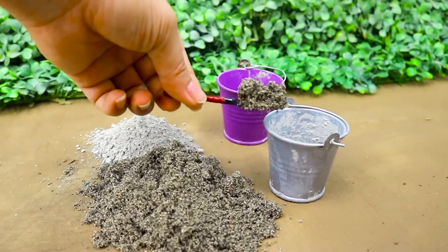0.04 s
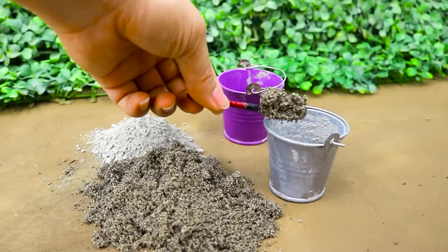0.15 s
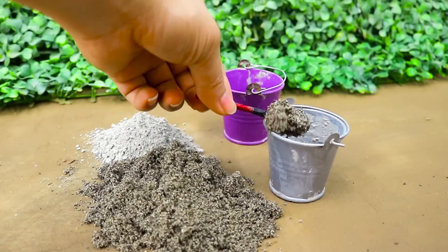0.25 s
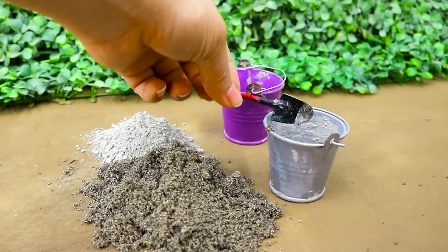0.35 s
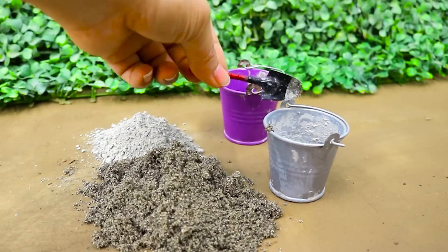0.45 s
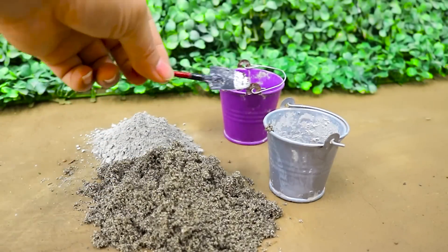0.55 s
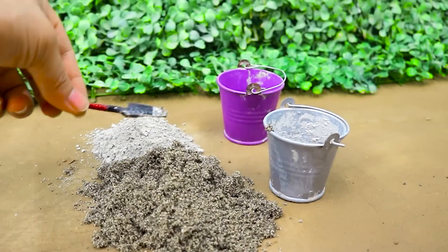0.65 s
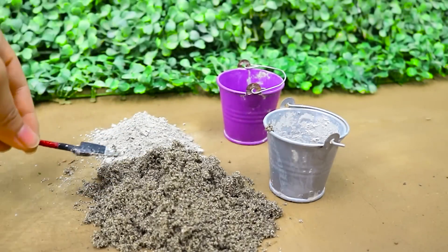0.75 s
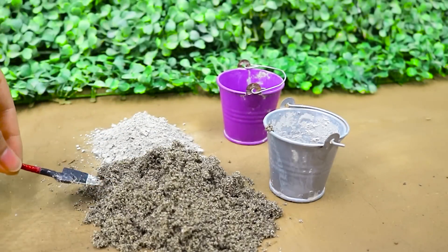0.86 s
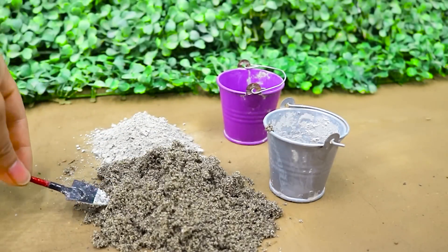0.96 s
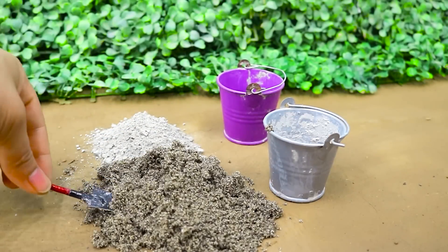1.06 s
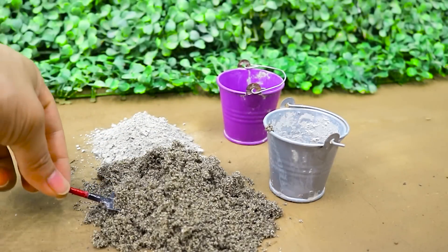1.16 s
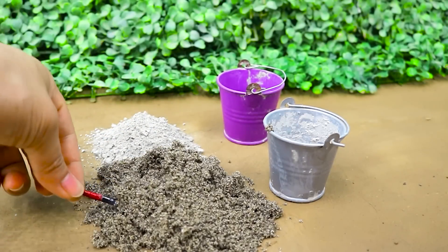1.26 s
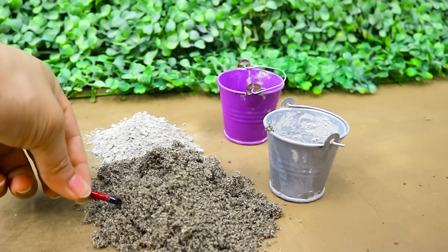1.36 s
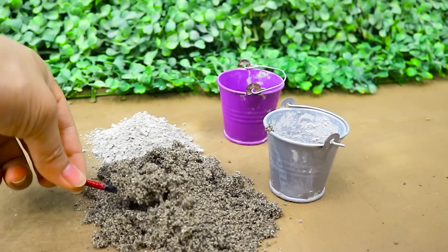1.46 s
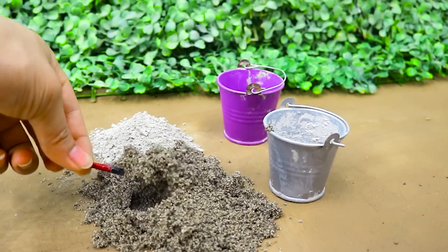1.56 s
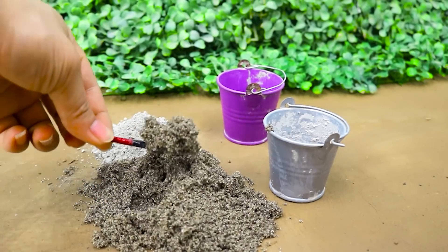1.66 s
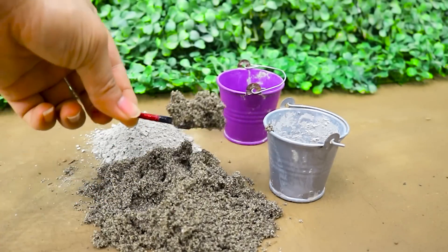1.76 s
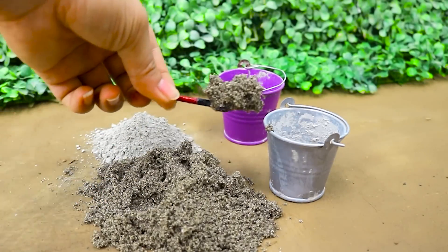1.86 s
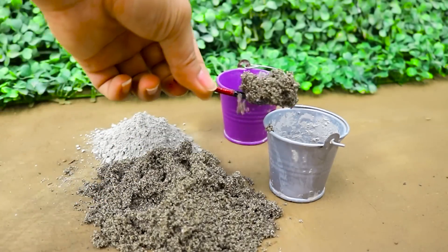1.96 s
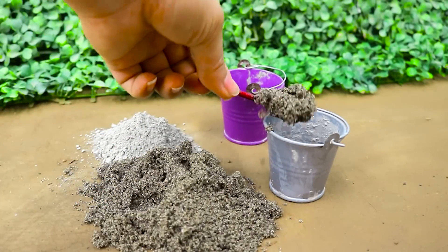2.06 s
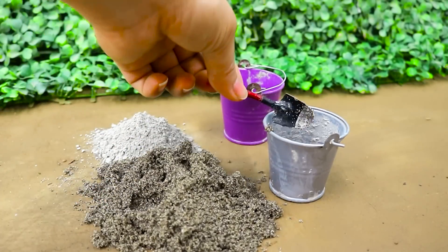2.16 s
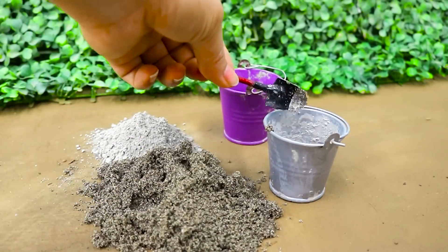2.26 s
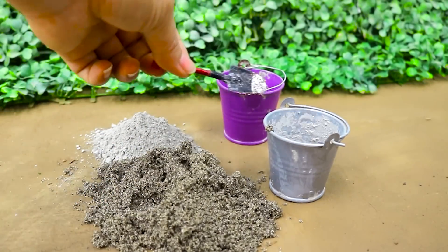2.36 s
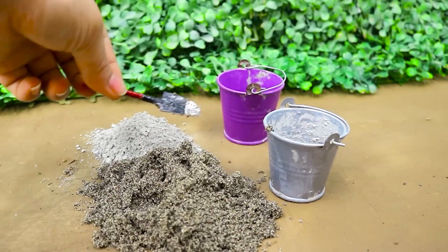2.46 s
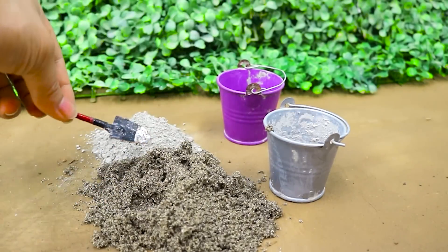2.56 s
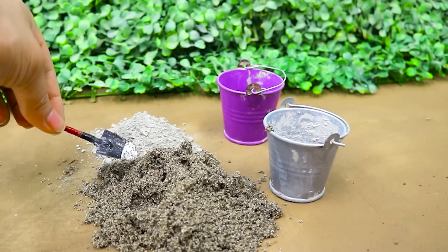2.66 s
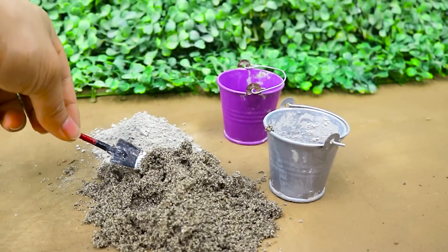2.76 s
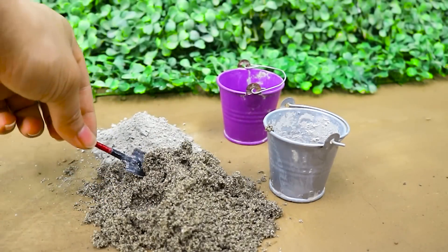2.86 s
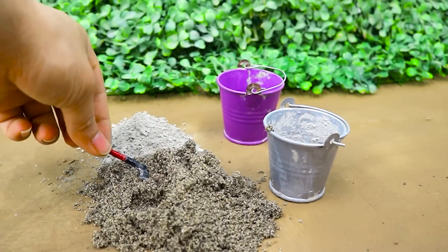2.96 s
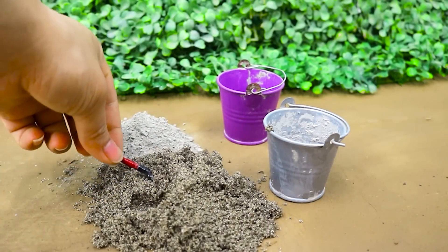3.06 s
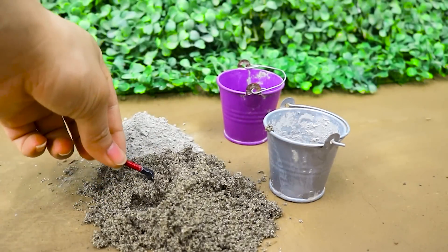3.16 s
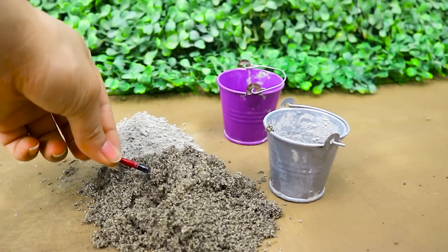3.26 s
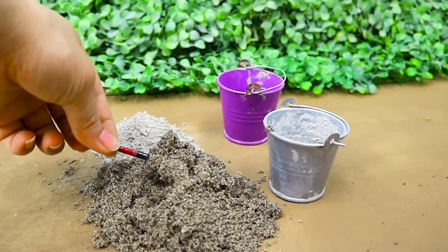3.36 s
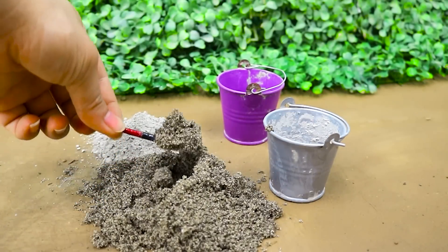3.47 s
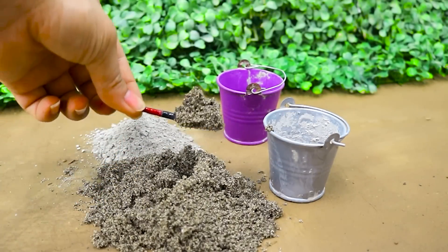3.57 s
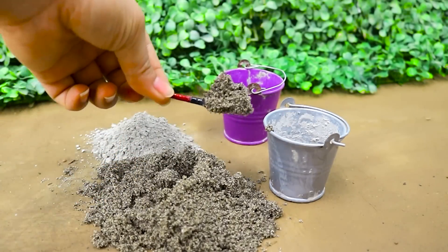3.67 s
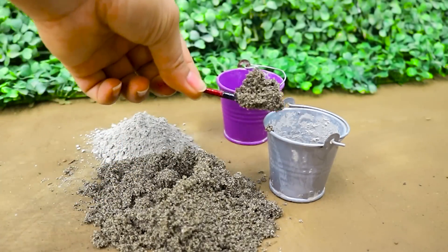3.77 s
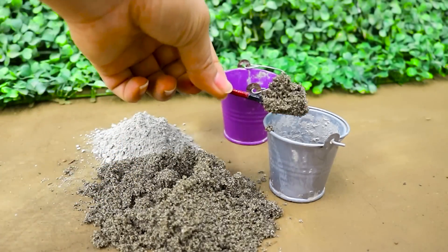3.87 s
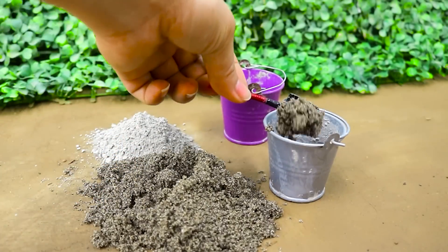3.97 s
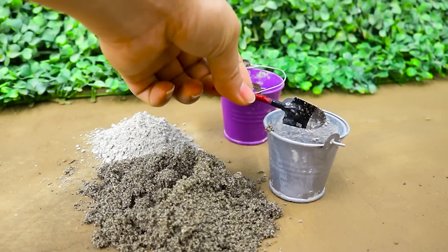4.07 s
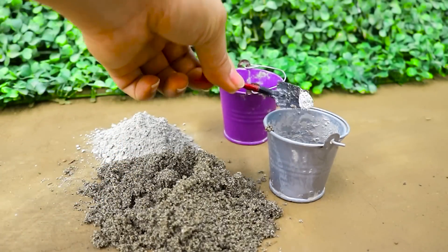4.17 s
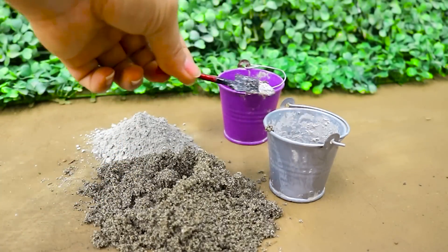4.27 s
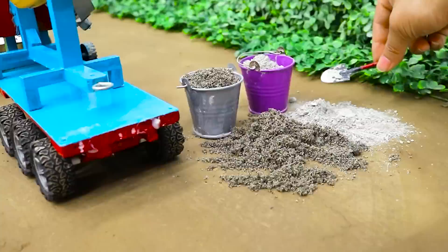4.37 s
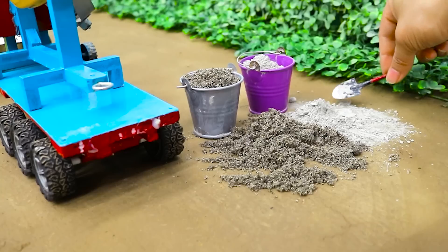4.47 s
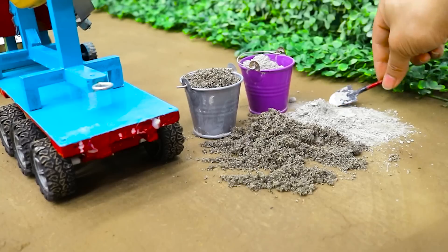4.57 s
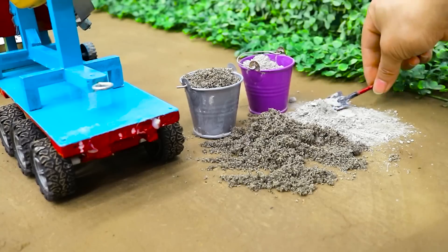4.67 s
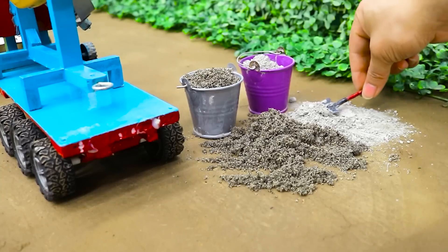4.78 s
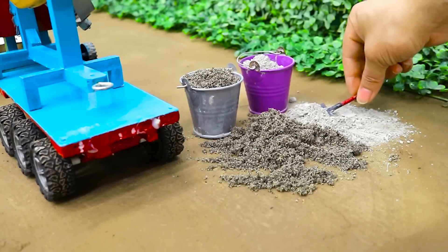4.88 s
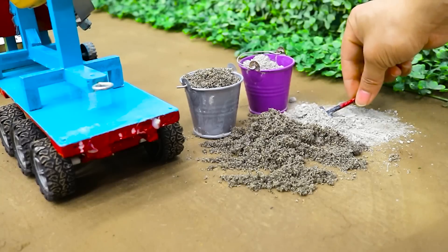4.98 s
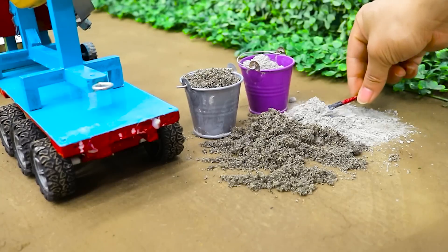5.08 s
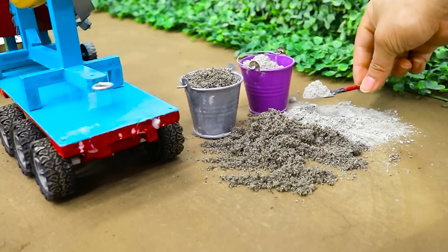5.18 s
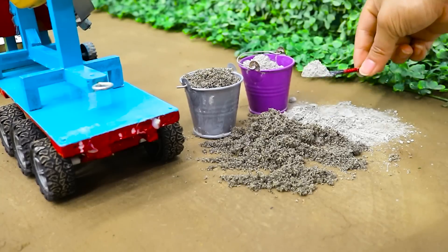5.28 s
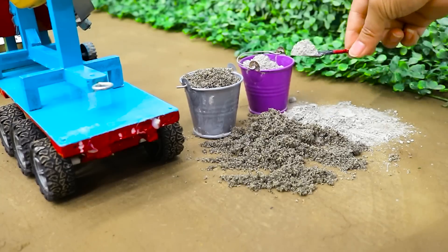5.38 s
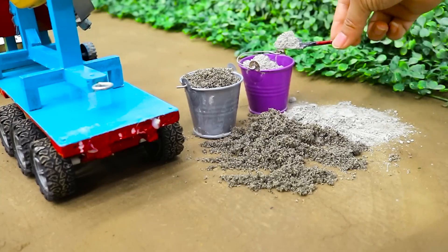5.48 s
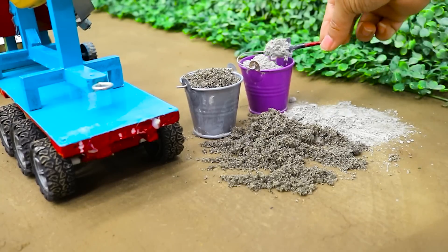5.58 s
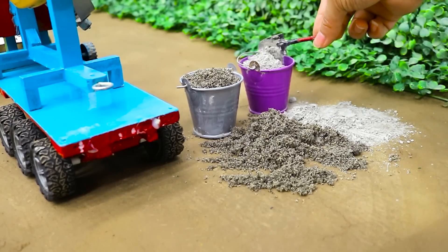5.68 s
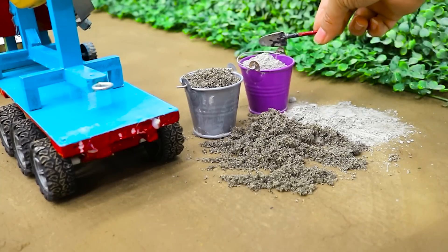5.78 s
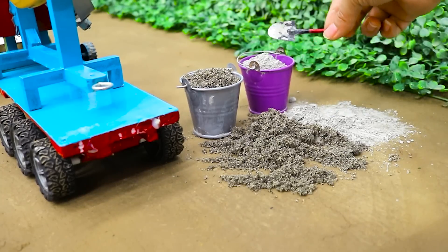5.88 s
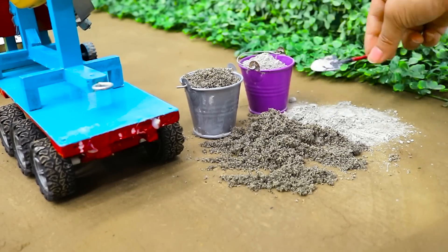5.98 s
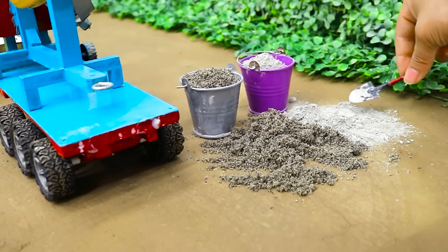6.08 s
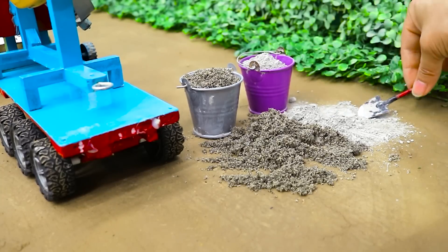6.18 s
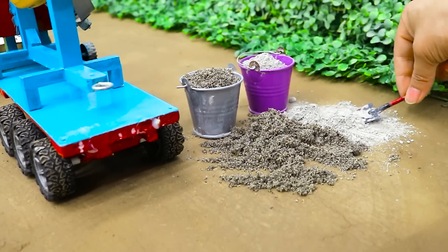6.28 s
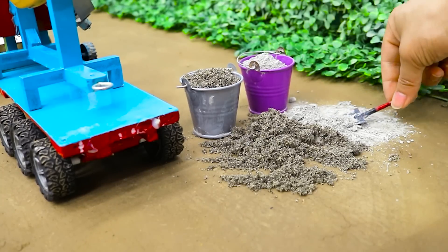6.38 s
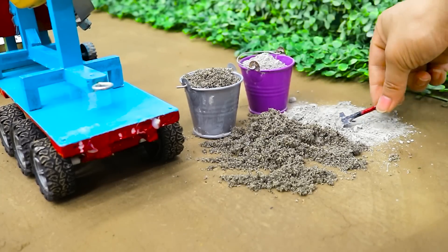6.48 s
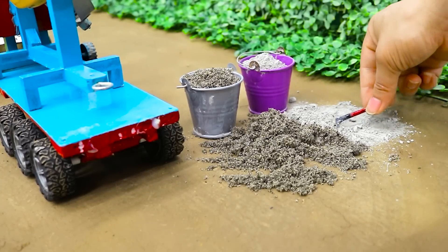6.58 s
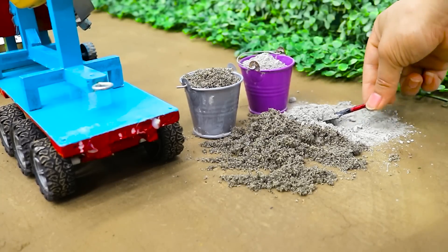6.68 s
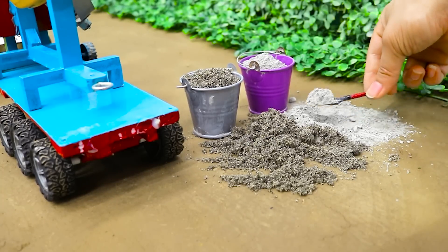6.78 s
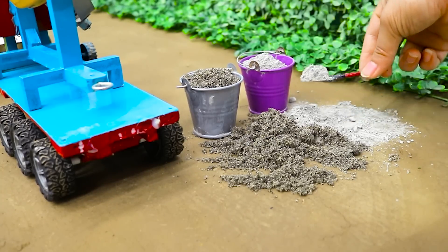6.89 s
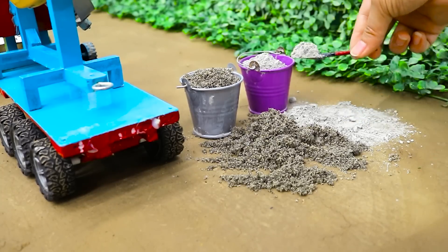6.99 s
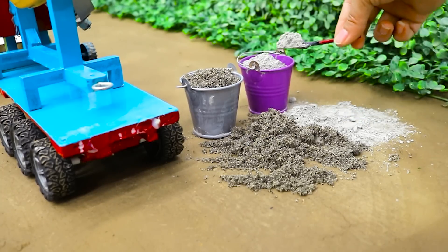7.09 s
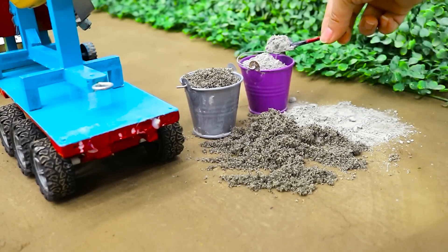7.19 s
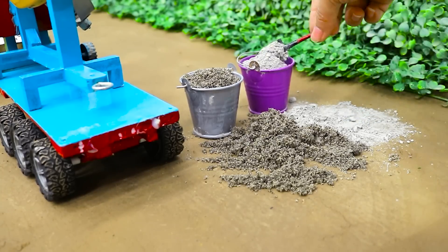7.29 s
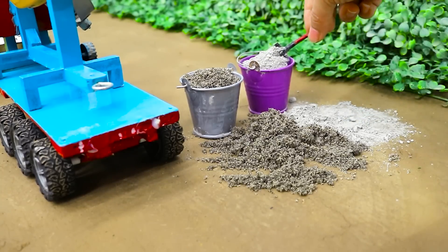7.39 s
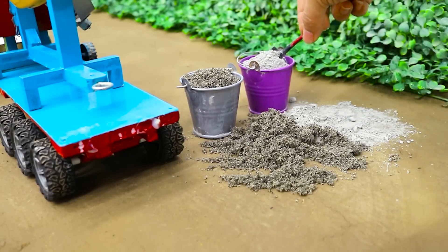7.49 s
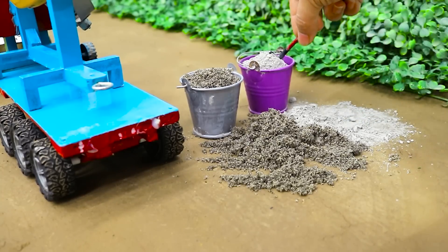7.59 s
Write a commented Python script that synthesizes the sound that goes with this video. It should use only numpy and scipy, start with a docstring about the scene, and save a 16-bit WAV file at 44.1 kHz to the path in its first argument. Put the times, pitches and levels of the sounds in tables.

```python
"""Toy shovel, sand and tin bucket

A toy shovel digs into a heap of dry sand and tips it into a little tin bucket, heard from close by.
One scoop and one pour recur: coloured streams of random grain impacts crunch along the blade and patter
on the tin, while sums of decaying sines ring blade and bucket. Stray grit ticks and the blade clinks.
Coloured noise makes a low rumble around each pour and a steady hush; a last scrape ends the scene."""
import sys
import numpy as np
from scipy import signal
from scipy.fft import rfft, irfft
from scipy.io import wavfile
from scipy.ndimage import uniform_filter1d

SR = 44100
rng = np.random.default_rng(int(sys.argv[2]) if len(sys.argv) > 2 else 0)


def generate_wav(signal):
    """Clip the signal to [-1, 1] and save it as 16-bit WAV at the path in sys.argv[1]."""
    frames = np.transpose(np.atleast_2d(signal))
    scaled = np.clip(frames, -1, 1) * 32767
    pcm = np.round(scaled).astype(np.int16)
    wavfile.write(sys.argv[1], SR, pcm)


N = 336924
TIME = np.arange(N) / SR
# Spectrum of grains falling on sand and tin.
# Each row: frequency in Hz, relative spectrum level in dB.
POUR_COLOUR = [(150, -46), (250, -14.5), (533, -7.5), (1060, -16), (1320, -6), (1890, -11), (2090, -1.5),
               (2600, -5.5), (3180, -6.5), (3640, -7), (4160, -3), (9190, -2.5), (12700, -15.5),
               (14000, -62.5)]
POUR_WINDOW_S = (1.446, 2.799)  # the pour and its rumble sound only between these times
SWITCH_DB_PER_S = 5000  # slope at both edges of that window


def undb(db):
    """Level and amplitude: 20 dB is a factor of ten in gain."""
    return 10 ** (np.asarray(db) / 20)


def through(x, response):
    """Linear system: the output is the input convolved with the impulse response."""
    return signal.oaconvolve(x, response)[:N]


def unit(response):
    """Normalisation: scale a response to unit energy."""
    return response / np.sqrt(np.sum(response ** 2))


def colour(points, band=None, size=4096):
    """Minimum-phase response by folding the cepstrum; white noise of rms 1 leaves with rms 1 in the band."""
    f = np.arange(size // 2 + 1) * SR / size
    hz, db = np.transpose(points)
    gain = undb(np.interp(np.log(f + 1), np.log(hz), db))
    lo, hi = band or (0, SR)
    gain = gain / np.sqrt(np.mean(gain ** 2 * (f >= lo) * (f <= hi)))
    cepstrum = irfft(np.log(gain))
    cepstrum[1:size // 2] *= 2
    cepstrum[size // 2 + 1:] = 0
    return irfft(np.exp(rfft(cepstrum)))


def split(x, hz, kind, order=2):
    """Band separation: a gentle Butterworth low-pass, high-pass or band-pass."""
    return signal.sosfilt(signal.butter(order, hz, kind, fs=SR, output="sos"), x)


def cut(x, hz):
    """Band limiting: a steep elliptic low-pass."""
    lowpass = signal.ellip(8, .2, 70, hz, fs=SR, output="sos")
    return signal.sosfilt(lowpass, x + 1e-18)  # the tiny offset avoids denormal numbers


def ring(modes):
    """Modal superposition: a struck body is a sum of decaying sines, each with the energy its dB gives."""
    t = TIME[:SR // 2]
    total = 0
    for k, (hz, db, t60) in enumerate(modes):
        envelope = undb(db - 60 * t / t60) / np.sqrt(t60)
        total = total + envelope * np.sin(2 * np.pi * hz * t) * (-1) ** k
    return unit(total)


def burst(t60):
    """Diffuse decay: exponentially dying noise, the sound of a dense cluster of tiny events."""
    t = TIME[:SR // 4]
    return unit(rng.standard_normal(len(t)) * np.exp(-np.log(1000) * t / t60))


def grains(rate, spread_db):
    """Shot noise: random collisions (rate a second) of uneven size, scaled to rms 1."""
    chance = np.clip(rate / SR, 1e-4, 1)
    hits = (rng.random(N) < chance) * rng.choice([-1, 1], N) / np.sqrt(chance)
    size = undb(spread_db * np.clip(rng.standard_normal(N), -2, 2))
    return hits * size / np.sqrt(np.mean(size ** 2))


def slips(rate, depth_db):
    """Stick-slip: sand holds and gives way in small jerks, an uneven gain of rms 1."""
    gain = undb(depth_db * np.interp(TIME * rate, np.arange(N), rng.standard_normal(N)))
    return gain / np.sqrt(np.mean(gain ** 2))


def blows(times, db):
    """Impulsive excitation: one single-sample impact for each event."""
    out = np.zeros(N)
    out[(np.asarray(times) * SR).astype(int)] = undb(db)
    return out


def swell(start, end, rise, fall):
    """Exponential envelope: rises (dB per s) to 1 at start, holds until end, then falls (dB per s)."""
    drop_db = rise * np.maximum(start - TIME, 0) + fall * np.maximum(TIME - end, 0)
    return undb(-np.minimum(drop_db, 160))


def together(gains):
    """Incoherent addition: unrelated sounds add in power."""
    return np.sqrt(sum(g ** 2 for g in gains))


def repeat(x, shifts):
    """Time translation: the same gesture shifted to each of its moments (s)."""
    padded = np.pad(x, ((0, 0), (N, N)))
    return sum(padded[:, N - round(s * SR):2 * N - round(s * SR)] for s in shifts)


def place(x, low_db, bright_db, t60):
    """Mid-side stereo: a central sound; antiphase decaying noise widens the lows and, faintly, the very top."""
    tail = through(x, burst(t60))
    side = undb(low_db) * split(tail, 770, "low") + undb(bright_db) * split(tail, 9600, "high")
    return np.array([x + side, x - side])


def cracks(rows, points, snap_db, crumble_db, t60):
    """Brittle fracture: a coarse grain snaps, then crumbles for a few milliseconds."""
    hits = blows(*np.transpose(rows))
    crumble = through(hits, burst(t60))
    return through(undb(snap_db) * hits + undb(crumble_db) * crumble, colour(points))


def shimmer(x, share_db, t60):
    """High-passed noise tail: each contact gets a brief, dense, bright shimmer."""
    bright_tail = split(through(x, burst(t60)), 2900, "high")
    return (x + undb(share_db) * bright_tail) / np.sqrt(1 + undb(2 * share_db))


def air(points, side_db, side_hz):
    """Mid-side noise field: coloured noise, wide in the bass and central above."""
    mid, side = (through(rng.standard_normal(N), colour(points)) for _ in range(2))
    side = undb(side_db) * split(side, side_hz, "low", order=1)
    return np.array([mid + side, mid - side])


def hush():
    """Stationary coloured noise: a faint hush whose level dips briefly at two moments."""
    # Spectrum of the hush. Each row: frequency in Hz, relative spectrum level in dB.
    hush_colour = [(12, -43), (30, -21), (65, -10), (110, -14.5), (170, -17), (270, -22.5), (420, -31),
                   (800, -36), (1600, -50), (12000, -63.5), (16000, -75.5)]
    level_db, dip_db = -57, -50
    dip_times_s, dip_length_s = [.928, 4.628], .076  # middles and length of the dips
    dipped = sum(np.abs(TIME - s) < dip_length_s / 2 for s in dip_times_s)
    gain = undb(level_db + dip_db * uniform_filter1d(1. * dipped, size=256))
    return gain * air(hush_colour, side_db=-1.5, side_hz=1200)


def rumble():
    """Low-weighted noise: a rumble whose level sags slowly in time."""
    # Spectrum of the rumble. Each row: frequency in Hz, relative spectrum level in dB.
    rumble_colour = [(12, -23), (28, 7), (48, -2), (75, -6), (110, -5), (165, -9), (240, -16.5),
                     (420, -22.5), (780, -28), (1300, -34.5), (2200, -34.5), (4400, -41), (9000, -34.5),
                     (13000, -42.5), (15000, -73.5)]
    level_db, sag_db_per_s = -40, 1.5  # level at the start of the pour window
    gain = undb(level_db - sag_db_per_s * (TIME - POUR_WINDOW_S[0]))
    return gain * air(rumble_colour, side_db=-5.0, side_hz=1200)


def dragging():
    """Friction envelope: the hiss and crunch gains of the last drags."""
    # Last drags of the blade.
    # Each row: start in seconds, end in seconds, hiss gain in dB, crunch gain in dB.
    drags = [(7.442, 7.504, -31.5, -43), (7.576, 7.64, -32.5, -38)]
    pulls = [(swell(start, end, 498, 400), hiss_db, crunch_db) for start, end, hiss_db, crunch_db in drags]
    hiss = together(pull * undb(db) for pull, db, _ in pulls)
    crunch = together(pull * undb(db) for pull, _, db in pulls)
    return hiss, crunch


def scrape():
    """Granular friction: dragging the blade through sand makes fine hiss, deep crunch and a crack."""
    # Spectrum of the dragged sand. Each row: frequency in Hz, relative spectrum level in dB.
    scrape_colour = [(180, -45), (300, -10), (915, -4), (994, -2.5), (1870, -5), (2480, -5), (6100, -6),
                     (10900, -2.5), (14500, -3.5), (16000, -24)]
    # Coarse grain cracking under the blade. Each row: time in seconds, relative level in dB.
    scrape_cracks = [(7.5441, -12.5)]
    hiss, crunch = dragging()
    high, low = colour(scrape_colour, (11000, 15000)), colour(scrape_colour, (400, 1200))
    fine = split(through(grains(rate=4600, spread_db=0) * hiss, high), 3000, "high")
    deep = split(through(grains(rate=3600, spread_db=1.5) * crunch, low), 4300, "low")
    crack = cracks(scrape_cracks, scrape_colour, snap_db=-6, crumble_db=7, t60=0.011)
    out = undb(-1.5) * fine + undb(-.3) * deep + crack
    return place(out, low_db=-10.5, bright_db=-13.0, t60=.08)


def digging():
    """Granular shear: hiss and crunch gains of thrusts as the blade bites, then surges as it lifts."""
    # Thrusts of the blade into the heap.
    # Each row: time of the hardest push in seconds, hiss gain in dB, crunch gain in dB.
    thrusts = [(2.938, -21, -41), (3.059, -21.5, -36)]
    # Surges of sand as the blade levers it up.
    # Each row: time of the peak in seconds, hiss gain in dB, rise and fall in dB per second.
    surges = [(3.149, -36, 194.5), (3.327, -28.5, 104), (3.412, -30.5, 192), (3.525, -36.5, 195)]
    bite_start, bite_end = 2.888, 3.091  # s: the blade meets the sand and comes to rest
    contact = swell(bite_start, bite_end, rise=2202, fall=2202)
    pushes = [(contact * swell(s, s, 237.5, 237.5), hiss_db, crunch_db) for s, hiss_db, crunch_db in thrusts]
    lift = (TIME > bite_end) * together(undb(db) * swell(s, s, rate, rate) for s, db, rate in surges)
    hiss = together([lift] + [push * undb(db) for push, db, _ in pushes])
    lift_crunch = undb(-22) * lift ** .7  # the crunch grows more slowly than the hiss
    crunch = together([lift_crunch] + [push * undb(db) for push, _, db in pushes])
    sunk = swell(2.915, 2.915, rise=350, fall=0)  # the heap crunches fully once the blade has sunk in
    return hiss, crunch * sunk


def scoop():
    """Friction-driven resonance: grains grind on the buried blade and ring it; the deeper heap crunches."""
    # Spectra of the bite and of the softer lift.
    # Each row: frequency in Hz, relative spectrum level in dB.
    bite_colour = [(120, -67), (200, -14), (240, -29), (273, -16), (647, -14.5), (899, -9.5), (1250, -15.5),
                   (2330, -11.5), (2610, -8.5), (3970, -7), (4350, -13), (5230, -5.5), (11700, 1),
                   (14900, -8), (16000, -32)]
    lift_colour = [(180, -24.5), (300, -28), (379, -10.5), (528, -1.5), (667, -6.5), (787, -3.5),
                   (2520, -3), (2740, 1), (3700, -6.5), (8640, 2.5), (12300, 1.5), (15200, -6),
                   (16000, -22.5)]
    # Modes of the blade in the sand.
    # Each row: frequency in Hz, relative energy in dB, 60 dB decay time in seconds.
    buried_blade = [(900, -14.5, 0.033), (1654, -1, 0.049), (2637, 14, 0.031), (3960, 6.5, 0.021),
                    (7400, -11.5, 0.034), (7290, -28.5, .03), (7636, 19, 0.018), (9120, -16, 0.052),
                    (9030, 14, 0.019), (10500, -3, .03), (11700, -3.5, 0.035), (13000, 1, 0.045)]
    # Coarse grains cracking under the blade. Each row: time in seconds, relative level in dB.
    crack_rows = [(2.9333, -14), (2.9950, -6), (3.0030, -6.5), (3.0375, -12), (3.0512, -14), (3.0603, -8),
                  (3.1343, -24), (3.2795, -23), (3.397, -10.5), (3.529, -23), (3.541, -26)]
    hiss, crunch = digging()
    biting = np.interp(TIME, [3.09, 3.12], [1, 0])
    lifting = 1 - biting
    jerks = slips(rate=240, depth_db=1.44)
    fine = grains(rate=1400 + 55000 * hiss, spread_db=1.0) * hiss * jerks
    deep = grains(rate=2500, spread_db=1) * crunch * jerks
    drive = fine * (undb(-11.0) * biting + undb(-13) * lifting)
    out = through(drive, ring(buried_blade))
    fine = shimmer(fine, share_db=-3.5, t60=0.033)
    for share, points in ((biting, bite_colour), (lifting, lift_colour)):
        high, low = colour(points, (5000, 15000)), colour(points, (400, 2000))
        out = out + undb(-0.18) * split(through(fine * share, high), 2400, "high")
        out = out + split(through(deep * share, low), 2600, "low", order=3)
    out = out + cracks(crack_rows, bite_colour, snap_db=-3.5, crumble_db=2, t60=0.027)
    return place(out, low_db=-13.5, bright_db=-24, t60=0.094)


def spill():
    """Sparse shot noise: lone grains drop before and after the pour, small ones high, clods lower."""
    # Grit spilling from the loaded blade, then trickling after the pour.
    # Each row: time of the peak in seconds, small-grain gain in dB, clod gain in dB.
    spills = [(1.93, -57, -51.5), (2.57, -53, -64)]
    small = split(grains(rate=180, spread_db=1.5), [5500, 12500], "band")
    clods = split(grains(rate=58, spread_db=1.5), [1400, 8500], "band")
    drops = 0
    for s, small_db, clods_db in spills:
        mixture = undb(small_db) * small + undb(clods_db) * clods
        drops = drops + swell(s, s, rise=199.5, fall=36) * mixture
    # each one skitters for an instant
    return drops + undb(-3) * through(drops, burst(t60=.01))


def ticks():
    """Impact excitation: sharp touches of grit and rim crack, and ring the modes of the blade."""
    # Grit and rim touching the blade.
    # Each row: time in seconds, relative level in dB, blade excitation relative to that level in dB.
    touches = [(1.93, -28, -25), (1.969, -35, -23), (2.1195, -17.5, -17), (2.513, -30, -16),
               (2.533, -31, -16), (2.540, -23, -5.5), (2.6444, -26, -9.5), (2.6772, -27, -18),
               (2.715, -28.5, -25), (2.7437, -24.5, 0), (2.748, -22.5, -8)]
    # Modes of the free blade.
    # Each row: frequency in Hz, relative energy in dB, 60 dB decay time in seconds.
    blade = [(5350, -6, .05), (5800, -23, .05), (7630, -8.5, 0.084), (7900, -2.5, 0.072), (8160, -9, .05),
             (8600, 2.5, 0.12), (9330, 5, 0.047), (10120, 2.5, 0.037), (12060, -1, .05), (12820, -18, .055)]
    s, db, ring_db = np.transpose(touches)
    touch = blows(s, db)
    contact = touch + undb(9.5) * through(touch, burst(t60=0.021))
    crack = split(through(contact, colour(POUR_COLOUR)), 6770, "high", order=3)
    clink = through(blows(s, db + ring_db), ring(blade))
    return undb(0.5) * crack + undb(13.5) * clink


def tipping():
    """Granular flow: gains of loose grains, the mass of the load and its slumping clumps."""
    # Clumps that slump off the blade and boom on the bottom.
    # Each row: time of the peak in seconds, relative gain in dB.
    slumps = [(2.308, -21.5), (2.503, -38.5)]
    # the loose grains flow fully once the blade is tipped
    tipped = swell(2.138, 2.138, rise=701.5, fall=0)
    hiss = tipped * undb(-23.5) * swell(2.25, 2.325, rise=130, fall=160)
    weight = undb(-40.5) * swell(2.1525, 2.29, rise=420, fall=180)
    boom = together(undb(db) * swell(s, s, rise=260.5, fall=699.5) for s, db in slumps)
    return hiss, weight, boom


def pour():
    """Impact-driven modes: grains patter on sand and tin, the wall rings, the bottom booms, lumps knock."""
    # Lumps landing in the bucket.
    # Each row: time in seconds, relative level in dB, wall excitation relative to that level in dB.
    lump_rows = [(2.147, -15, -17), (2.256, -3.5, 0), (2.285, -20.5, 1), (2.304, -13.5, 3), (2.329, -7, -3),
                 (2.379, -16.5, 5), (2.428, -31.5, 16), (2.477, -22, 1.5)]
    # Modes of the bucket wall, then of its bottom.
    # Each row: frequency in Hz, relative energy in dB, 60 dB decay time in seconds.
    wall_modes = [(646, -11, .4), (1376, -2, 0.17), (1412, -2, 0.19), (1713, 2, 0.19), (2103, -2.5, .28),
                  (2853, 2.5, 0.057), (2910, -9, .1), (3133, 2, 0.11), (3190, 4, .1), (4060, -3, .16),
                  (4410, -8.5, .11), (4750, -7, .12), (4970, 0.5, .11), (5200, -6, 0.14),
                  (5860, 1.5, 0.082), (6030, 2, 0.13), (6720, 5.5, .1), (6800, -5, 0.14), (7500, 1.5, .11),
                  (8000, -0.5, .1), (7900, -3, .08), (8880, -7, .08), (9550, 1.5, 0.049)]
    bottom_modes = [(2101, 4, 0.08), (1940, -7.5, .05)]
    hiss, weight, boom = tipping()
    high, low = colour(POUR_COLOUR, (4000, 12000)), colour(POUR_COLOUR, (400, 1300))
    # a thin trickle breaks up into single grains
    fine = grains(rate=600 + 130000 * hiss, spread_db=1.5) * hiss * slips(rate=200, depth_db=1.4)
    bulk = grains(rate=2500, spread_db=3.5) * undb(np.interp(TIME, [2.38, 2.52], [0, -18]))
    s, db, ring_db = np.transpose(lump_rows)
    lumps = through(blows(s, db), burst(t60=.032))
    contacts = shimmer(fine + undb(7) * lumps, share_db=-2.5, t60=0.043)
    patter = undb(-1.5) * split(through(contacts, high), 1900, "high")
    thud = undb(-1.5) * split(through(bulk * weight, low), 1700, "low", order=3)
    # the hollow of the bucket holds the middle tones a moment longer
    hollow = undb(-10.5) * split(through(patter + thud, burst(t60=0.082)), [800, 3600], "band")
    # the settling sand damps the tin
    damping = np.interp(TIME, [2.49, 2.64], [1, 0])
    wall_drive = undb(-18.0) * fine + undb(4.5) * blows(s, db + ring_db)
    wall = damping * through(wall_drive, ring(wall_modes))
    # the bottom gives back a set share of the energy of the boom envelope
    bottom = undb(-7.5) * unit(through(bulk * boom, ring(bottom_modes))) * np.sqrt(np.sum(boom ** 2))
    bucket = patter + thud + hollow + wall + bottom
    out = cut(bucket + ticks() + spill(), 13100)
    return place(out, low_db=-9.0, bright_db=-19.5, t60=.08)


def scene():
    """Superposition: scoops and pours take turns over a faint hush, and a scrape follows."""
    # Offsets of every scoop and every pour from the times in their tables, in seconds.
    scoop_shifts = [-1.7674, 0, 1.9326, 3.5514]
    pour_shifts = [-1.9161, 0, 1.7839, 3.5514, 5.038]
    present = swell(*POUR_WINDOW_S, SWITCH_DB_PER_S, SWITCH_DB_PER_S)
    scoops = repeat(scoop(), scoop_shifts)
    pours = repeat(present * (pour() + rumble()), pour_shifts)
    return scoops + pours + scrape() + hush()


def record(dry):
    """Band limiting: a steep low-pass removes the top above 16 kHz."""
    return cut(dry, 16000)


dry = scene()
out = record(dry)
generate_wav(out)
```